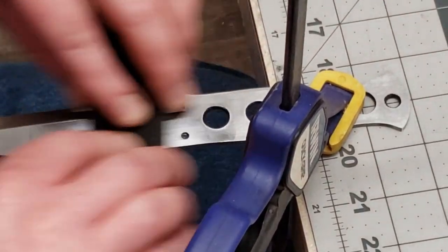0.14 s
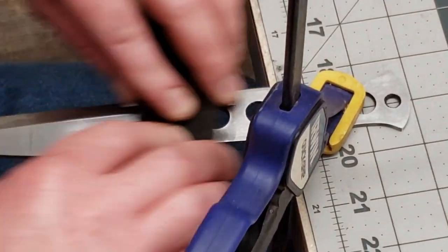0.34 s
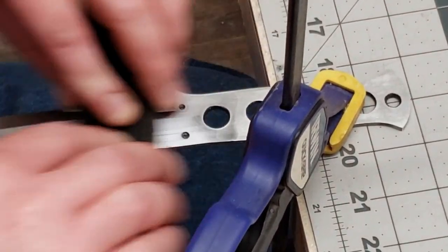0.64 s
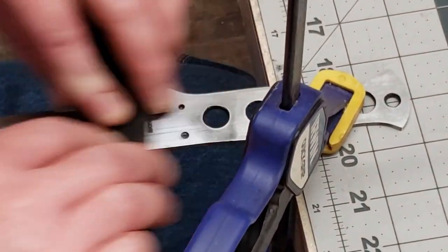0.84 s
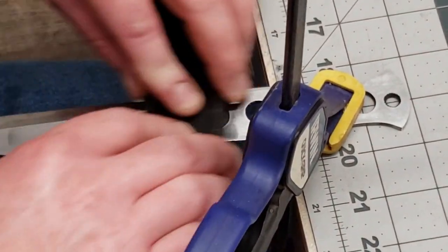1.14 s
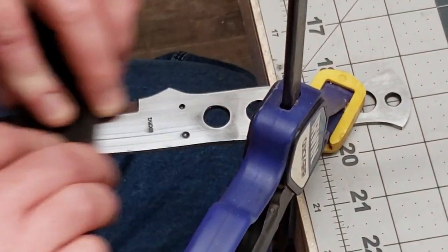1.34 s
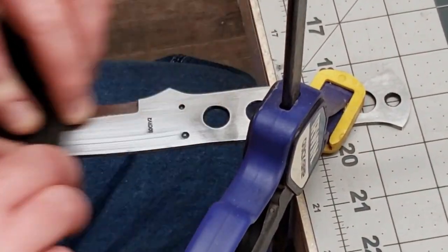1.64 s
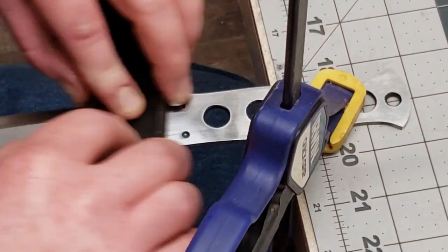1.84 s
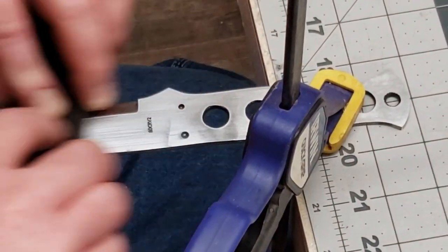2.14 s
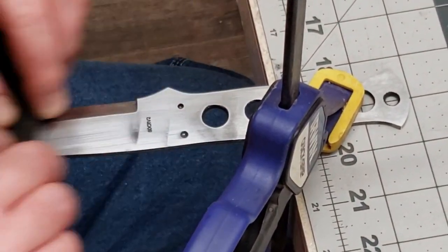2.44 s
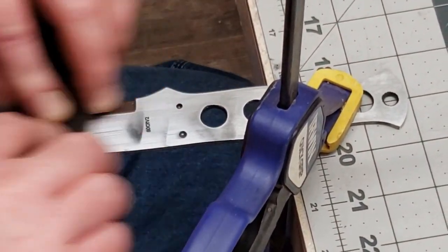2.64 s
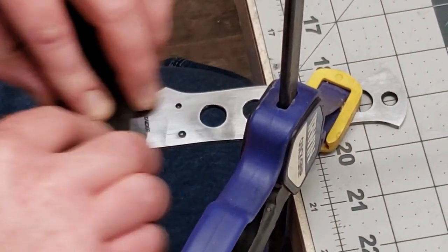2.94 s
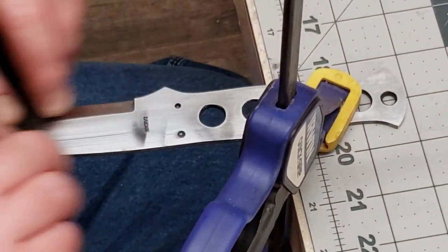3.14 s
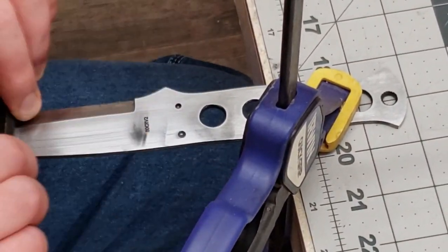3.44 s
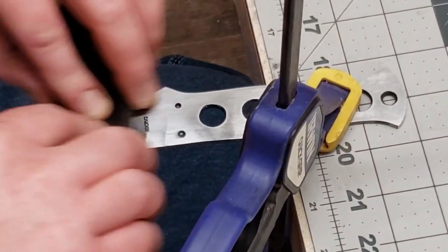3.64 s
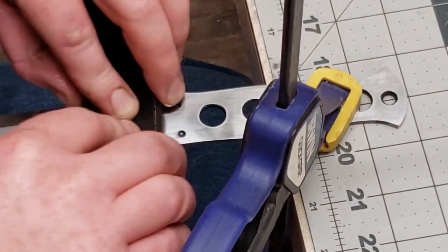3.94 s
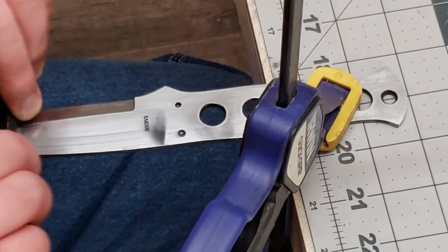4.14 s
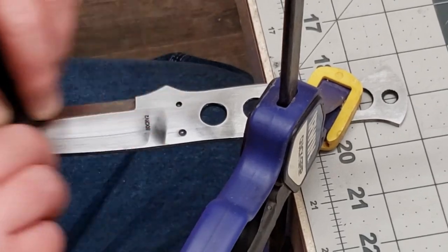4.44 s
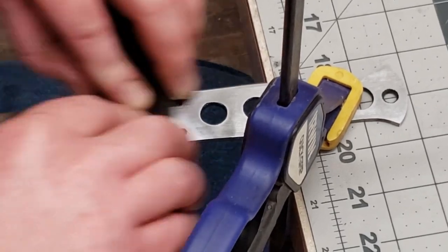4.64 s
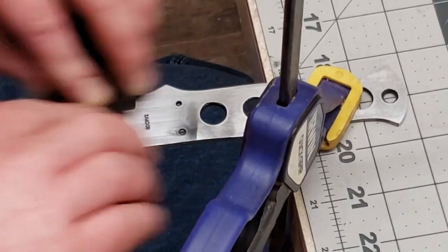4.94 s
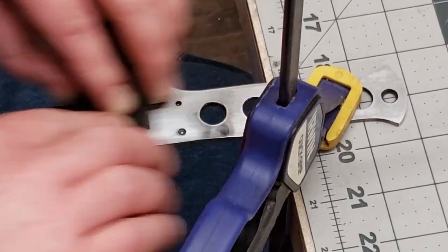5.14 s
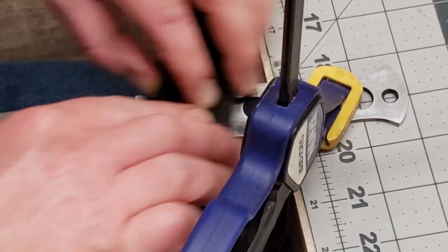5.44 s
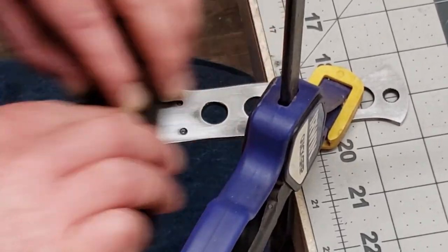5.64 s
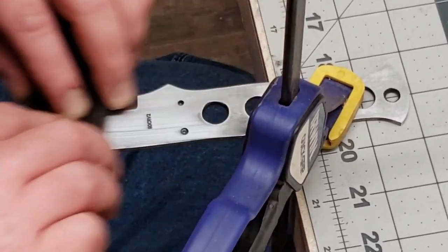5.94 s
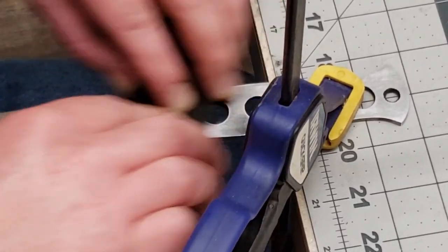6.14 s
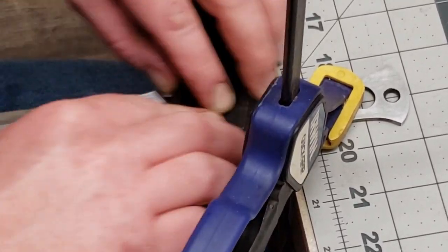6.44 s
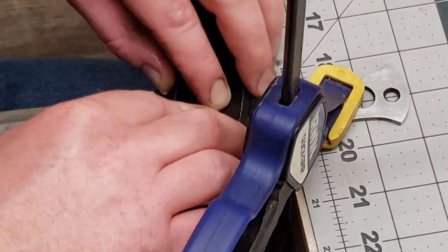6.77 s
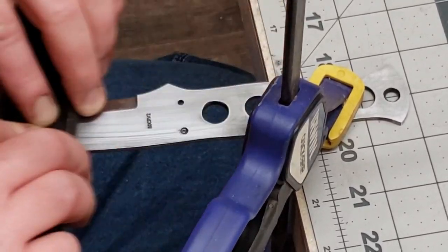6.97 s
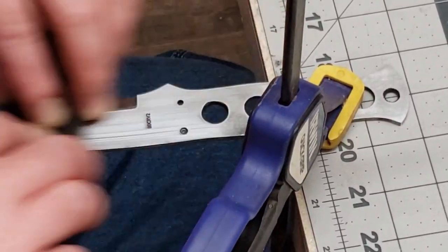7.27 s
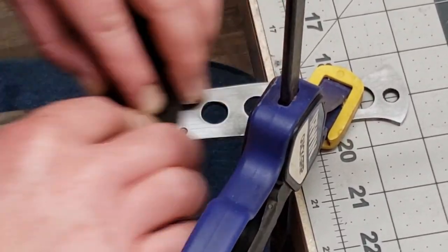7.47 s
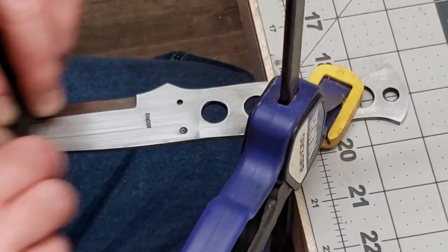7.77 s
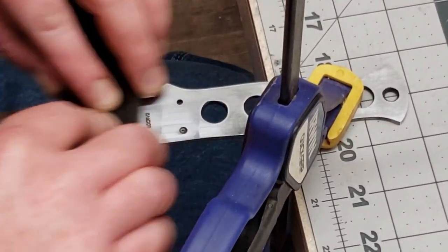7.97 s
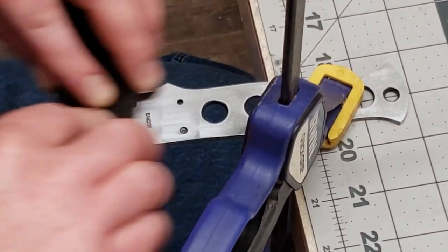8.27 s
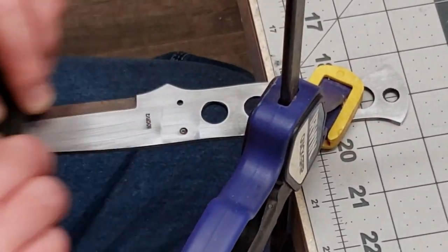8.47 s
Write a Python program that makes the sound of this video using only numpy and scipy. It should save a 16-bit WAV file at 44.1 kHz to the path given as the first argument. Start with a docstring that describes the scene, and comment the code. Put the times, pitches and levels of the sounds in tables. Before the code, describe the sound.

A block wrapped in sandpaper scrubs steadily to and fro over steel. Each stroke is a short, crisp hiss with an abrupt dip as the direction reverses. Beneath it a faint, lumpy low bench rumble swells with the strokes. Irregular soft thumps and clamp rattles, brief squeaky rubs, and small grain clicks interrupt the rhythm. It is recorded very near in a quiet, dry room, and continues to the end without a pause.

```python
"""Close up, grit hisses from the first moment, stroke after stroke, and drops away at each turn.
Sandpaper on a block is rubbed over a steel blade clamped to the edge of a workbench.
Loose grains tick, the paper bites at the step in the blade, and block on blade rubs and squeaks: all shaped noise.
The block knocks blade and bench: dull thumps of decaying sines, over a lumpy rumble of noise in bench modes.
Behind it lie a faint, short room tail and quiet air; the microphone drops the deepest bass."""
import sys
import numpy as np
from scipy import signal
from scipy.io import wavfile
from scipy.ndimage import uniform_filter1d

SR = 44100
rng = np.random.default_rng(int(sys.argv[2]) if len(sys.argv) > 2 else 0)


def wrap_up_sound(samples):
    """Save the sound to the file named by the first command line argument, as 16-bit audio."""
    columns = np.atleast_2d(samples).T
    # keep every value between -1 and 1, then stretch to whole-number steps
    tamed = np.clip(columns, -1, 1)
    steps = np.round(tamed * 32767).astype(np.int16)
    wavfile.write(sys.argv[1], SR, steps)


N = 379701

# Place: level of the air; tail of the room, its level relative to the near sounds
AIR_DB, ROOM_T60_S, ROOM_DB = -73.5, 0.2, -35.5

# Bench shaken by the hands, before the swell within each stroke: start_s, rumble_db, rattle_db
BENCH_SHAKING = [(0.0, -55.5, -62), (0.43, -57, -68.5), (0.81, -52, -54.5), (1.22, -51.5, -58.5),
                 (1.56, -45.5, -58.5), (2.04, -54, -69), (2.47, -49.5, -55), (2.61, -60.5, -65),
                 (3.12, -47.5, -61.5), (3.45, -54.5, -62), (3.64, -51, -64.5), (4.77, -59, -64.5),
                 (5.32, -59, -66.5), (5.83, -46.5, -54), (6.16, -52, -65), (6.62, -45, -59),
                 (7.12, -56.5, -64), (8.61, -58.5, -63)]
# Low bench modes: pitch_hz, width_hz (of each of two passes), relative_level_db
SHAKE_MODES = [(61.4, 87, 1.5), (110.5, 110, -5.5)]
# Higher, rattling bench modes: pitch_hz, width_hz (of each of two passes), relative_level_db
RATTLE_MODES = [(252.7, 210, 2.5), (416.7, 96, 8), (602, 260, 2.5)]
BUILD_UP_DB = 8.5   # the shaking grows over each stroke

# Brief rubs and squeaks of block on blade:
# centre_s, length_s (four standard deviations), pitch_hz, width_hz (of each of two passes), level_db
RUBS = [(0.558, 0.081, 1330, 46.3, -49), (0.595, .07, 1374, 45, -56), (0.755, 0.23, 1320, 70, -56),
        (.93, 0.14, 1380, 70, -57), (4.548, 0.084, 2920, 972, -50), (5.204, 0.049, 423, 247, -43),
        (5.211, 0.049, 1110, 500, -52), (6.589, .03, 725, 231, -50), (2.379, 0.039, 384, 111.1, -43),
        (5.11, 0.076, 510, 200, -53.5), (2.487, 0.019, 1330, 200, -49), (6.802, .01, 1300, 300, -50)]

# Knocks, relative levels: start_s, bench_top_db, bench_swing_db, clamp_db, blade_db
KNOCKS = [(0.204, -34.5, -51, -40.5, -46.5), (0.683, -37.5, -49, -60, -63),
          (0.73, -33.5, -47.5, -38.5, -40), (0.804, -41, -48, -44, -44), (0.92, -27.5, -43.5, -42, -49),
          (0.989, -49, -51, -58, -54), (1.543, -23.5, -37, -20, -30), (1.597, -19, -30, -37, -36),
          (1.718, -38.5, -47, -56, -59), (1.932, -26.5, -37, -29, -32.5), (2.304, -25, -42, -27, -28.5),
          (2.391, -22, -39.5, -42, -39.5), (2.464, -47, -53, -55, -45), (2.501, -50, -45.5, -65, -56),
          (2.609, -25, -40.5, -25, -30), (2.802, -39, -47, -51, -54), (3.117, -42.5, -50.5, -61, -49),
          (3.376, -3.5, -30.5, -21.5, -23), (3.476, -40, -45.5, -50, -45.5),
          (3.878, -21, -42.5, -35.5, -36), (4.317, -28.5, -38.5, -32, -33), (4.596, -38, -45.5, -59, -48),
          (4.673, -36.5, -45.5, -50, -50.5), (5.602, -32, -49, -42, -37.5), (5.78, -29.5, -38, -30, -24),
          (4.48, -39, -55.5, -59, -58), (5.951, -36.5, -51.5, -56, -50), (6.135, -27, -36, -30.5, -25),
          (6.31, -43, -39.5, -50, -61), (6.458, -21, -30.5, -22, -19), (6.496, -31.5, -46, -43, -51),
          (6.561, -35.5, -46, -44, -44), (6.655, -33.5, -37.5, -41, -33.5), (6.767, -32, -39, -36, -27.5),
          (6.812, -23, -28, -30.5, -29.5), (6.925, -37, -45, -58.5, -60.5), (7.779, -34.5, -44, -63, -47),
          (7.898, -32.5, -49, -32.5, -35), (8.347, -35.5, -55, -36, -37)]
# What rings after a knock, one group each for bench top, bench swing, clamp and blade:
# pitch_hz, relative_level_db, ring_s (sets both the swell and the decay)
KNOCKED_PARTS = [
    [(218, -6, 0.04), (344, -9, 0.051), (408, -10, 0.035)],
    [(75.6, 1, 0.12), (120.5, 6.5, 0.082)],
    [(642, -1.5, 0.027), (820, -10.5, 0.037)],
    [(1034, 0, 0.01), (1274, -4, 0.029), (2063, -23.5, 0.045), (2600, -35, 0.014)],
]
# Sharp blows favour the upper modes of the bench top:
# dB per octave, for each dB that the top rings above the swing
SHARPNESS = 0.52

# Loose grains crushed under the paper, relative levels: start_s, low_tick_db, bright_tick_db
TICKS = [(0.0453, -21, -35), (0.3718, -27, -38), (0.4467, -25, -42), (0.7238, -27, -43), (0.9523, -27, -41),
         (1.0972, -23.5, -46), (1.4062, -33, -40), (1.4766, -18, -35), (1.933, -24, -52),
         (2.5127, -32, -36), (2.6357, -29, -40), (3.2042, -36, -38), (5.0425, -18, -47),
         (5.2527, -30, -51.5), (5.3705, -26, -42), (5.7126, -27.5, -48), (6.0657, -22, -30),
         (6.401, -32, -33), (6.627, -24, -33), (7.1287, -31, -38), (7.3387, -24.5, -40), (7.529, -27, -40),
         (7.6942, -28.5, -49), (8.179, -32.5, -39)]

# Strokes from turn to turn: start_s, turn_s (length of the turn before it), hiss_level_db,
# lean_db (late minus early), scrape_db (extra in the lower and middle bands)
STROKES = [(0.0, 0.042, -42.0, 3.5, 1.9), (0.166, 0.062, -46.5, -1.3, 3.5),
           (0.327, 0.045, -40.5, 6.5, -0.9), (0.488, 0.055, -43, 0.1, 1.5), (0.663, 0.039, -42, -0.5, 0.6),
           (0.843, 0.057, -43.5, 8, 2), (1.03, 0.04, -42, 0.9, 2.3), (1.209, 0.049, -44, 8, -1.5),
           (1.398, 0.039, -43, 1, 2), (1.585, 0.041, -43.5, 0, 2.2), (1.798, 0.043, -44.5, -3.5, 0.6),
           (1.971, 0.042, -49, 15, -0.2), (2.152, 0.037, -46, -6.5, 0.6), (2.328, 0.037, -44.5, 0.5, 1.6),
           (2.494, 0.04, -44.5, -6.5, -1), (2.672, 0.048, -45.6, 5, 0), (2.839, 0.038, -44, -8.5, 0.2),
           (3.01, 0.04, -46.5, 10.5, 1), (3.184, 0.046, -47, -4, -0.0), (3.356, 0.047, -47.5, -1, -0.2),
           (3.528, 0.037, -47.5, -6.5, 0.8), (3.712, 0.043, -48, 7.5, -3.5),
           (3.869, 0.04, -47.5, -5.5, 1.5), (4.053, 0.038, -48, 3.5, -1.3), (4.233, 0.05, -46, -6.5, 1.2),
           (4.409, 0.055, -47, 4.5, -1), (4.586, 0.034, -51, 3.5, -0.3), (4.791, 0.038, -49.5, -1.7, -2),
           (4.957, 0.02, -47.5, 1.5, -4.1), (5.149, 0.042, -47.5, -5.5, 0.7),
           (5.316, 0.037, -47.5, 9, -2.5), (5.49, 0.045, -47, 3.5, 0.5), (5.673, 0.059, -41.5, 7, -0.7),
           (5.839, 0.061, -43.5, -1, -1.8), (6.01, 0.052, -46, 4, 1.2), (6.187, 0.052, -44.5, 2.8, -1.2),
           (6.351, 0.046, -42.5, 10, 0.5), (6.519, 0.055, -42, -1, 2.7), (6.689, 0.017, -44, 10.5, 1),
           (6.883, 0.045, -43, -4.0, 0.9), (7.057, 0.028, -44.5, 8.5, -1.2), (7.243, 0.053, -43.5, 2, -2),
           (7.431, 0.039, -46.5, 0.7, -1), (7.617, 0.041, -48.5, 6, -1.7), (7.811, 0.028, -49.5, -8, 1.5),
           (8.021, 0.046, -50.5, 7, -3.5), (8.229, 0.048, -49.7, -1.5, -0.2),
           (8.423, 0.048, -49, 4.5, -2.3)]
# The paper bites harder for a moment: centre_s, extra_db, length_s (two standard deviations)
BITES = [(0.432, 0, 0.015), (0.99, 2.5, 0.013), (1.435, 3, .02), (1.534, 5, .02), (1.74, 5.5, 0.02),
         (2.097, 4.5, .01), (3.227, 8, 0.024), (3.383, 13, .015), (3.91, 2, .02), (4.619, 13.5, 0.035),
         (4.733, 8, 0.011), (5.1, 16, .014), (5.422, 11.5, 0.015), (5.772, 6, 0.012), (6.112, 12, .025),
         (6.443, 7.5, 0.038), (6.615, 3.5, .015), (6.811, 8.5, 0.025), (7.309, 5.5, .015),
         (7.757, 8, 0.018), (8.312, 4, .015)]
REST_DB, DROP_DB_PER_S = -72.5, 906   # hiss with the block at rest; a quick turn does not fall that far
SLOW_DOWN_SHARE, SPEED_UP_SHARE = 0.73, 0.72   # slopes as shares of the turn
ARCH_DB = 1.5   # extra hiss midway along the stroke

# Colour of the grit hiss: pitch_hz, relative_level_db (per Hz), follow (dB of change per dB of stroke level)
GRIT_COLOUR = [(304, -5, 1), (724, -11, 0.78), (1380, -9, 0.63), (2560, -8, 0.54), (3300, -8.5, 0.67),
               (4740, -10, 0.7), (5680, -5.5, 1.0), (8110, 1, 1.13), (10580, -7.5, 1.47),
               (12100, -17.5, 0.7), (15620, -23.5, 2)]
# Faint rings of the blade: pitch_hz, width_hz (of each of two passes), level_db (relative to the hiss)
BLADE_RINGS = [(1354, 49, -33.5), (3588, 270, -20), (6020, 390, -17)]
# Slow course of the top of the hiss: time_s, level_db
SHEEN = [(0, -0.5), (1.2, 0.5), (2.4, 1), (3.6, -1), (4.8, -2.5), (6, -3), (7.2, 1.5), (8.61, -4)]
# Scrape acts below SCRAPE_HZ; sheen sets in at SHEEN_HZ and is full an octave higher
USUAL_STROKE_DB, SCRAPE_HZ, SHEEN_HZ = -44, 4600, 8500


def from_db(db):
    """Decibels to gain."""
    return 10 ** (np.asarray(db) / 20)


def rms_one(x):
    """Scaled to rms 1."""
    return x / np.sqrt(np.mean(x ** 2) + 1e-20)


def drift(rate_hz):
    """Slow random wander of rms 1: noise smoothed at every 20th sample, then joined by lines."""
    pole = np.exp(-2 * np.pi * rate_hz * 20 / SR)
    noise = rng.standard_normal(N // 20 + 2002)
    slow = signal.lfilter([1], [1, -2 * pole, pole * pole], noise)[2000:]   # settled part only
    return np.interp(np.arange(N) / 20, np.arange(len(slow)), rms_one(slow))


def resonate(x, hz, width_hz):
    """One resonance, gain about 1 on top."""
    r = np.exp(-np.pi * width_hz / SR)
    feedback = [1, -2 * r * np.cos(2 * np.pi * hz / SR), r * r]
    return signal.lfilter(np.array([1, 0, -1]) * (1 - r * r) / 2, feedback, x)


def resonate_twice(x, hz, width_hz):
    """The same resonance passed twice, for steeper skirts."""
    return resonate(resonate(x, hz, width_hz), hz, width_hz)


def add(out, start_s, sound):
    """Lays a sound into out at start_s."""
    i = round(start_s * SR)
    out[i:i + len(sound)] += sound[:N - i]


def stroke_phase():
    """Strokes done so far, counting smoothly."""
    turns_s = [row[0] for row in STROKES] + [N / SR]
    return np.interp(np.arange(N) / SR, turns_s, np.arange(len(STROKES) + 1))


def stroke_db(bend=0.225):
    """Hiss level in time: up from the turn, leaning across the blade, down to the next turn, plus the bites."""
    start, turn_s, level, lean, _ = np.transpose(STROKES)
    end = np.append(start[1:], N / SR)
    turn_db = (level + np.roll(level, 1)) / 2 - DROP_DB_PER_S * turn_s
    turn_db = np.maximum(turn_db, REST_DB)
    early = start + SPEED_UP_SHARE * turn_s
    late = end - SLOW_DOWN_SHARE * np.roll(turn_s, -1)
    points_s = np.transpose([start, early, (early + late) / 2, late]).ravel()
    points_db = np.transpose([turn_db, level - lean / 2, level + ARCH_DB, level + lean / 2]).ravel()
    t = np.arange(N) / SR
    # lines drawn in bent gain: the block leaves and reaches rest abruptly
    eased = from_db(bend * np.append(points_db, REST_DB))
    level_db = 20 * np.log10(np.interp(t, np.append(points_s, N / SR), eased)) / bend
    for centre_s, extra_db, length_s in BITES:
        level_db += extra_db * np.exp(-2 * ((t - centre_s) / length_s) ** 2)
    return level_db


def air():
    """Quiet air: steady noise through two broad resonances."""
    noise = rng.standard_normal(N)
    return from_db(AIR_DB) * rms_one(resonate(resonate(noise, 900, 4900), 2000, 20000))


def room(near):
    """Reflections as a decaying, dull noise tail, starting 4 ms after the direct sound."""
    t = np.arange(SR // 3) / SR
    dull = signal.lfilter([.4], [1, -.6], rng.standard_normal(len(t)))
    tail = dull * from_db(-60 * t / ROOM_T60_S) * (t > .004)
    return signal.fftconvolve(near, tail / np.sqrt(np.sum(tail ** 2)))[:N]


def bench(level_db, follows=0.22):
    """Lumpy noise shakes the bench modes; it grows over each stroke and eases a little at each turn."""
    start_s, shake_db, rattle_db = np.transpose(BENCH_SHAKING)
    t, out = np.arange(N) / SR, 0
    for modes, course_db in (SHAKE_MODES, shake_db), (RATTLE_MODES, rattle_db):
        push = rng.standard_normal(N) * from_db(4.0 * drift(14.0))
        body = sum(from_db(db) * resonate_twice(push, hz, width_hz) for hz, width_hz, db in modes)
        out = out + from_db(np.interp(t, start_s, course_db)) * rms_one(body)
    growth_db = uniform_filter1d(BUILD_UP_DB * (stroke_phase() % 1 - .5), size=600)
    easing_db = follows * np.minimum(level_db - USUAL_STROKE_DB, 0)
    return out * from_db(growth_db + easing_db)


def rubs():
    """Block rubbing on blade: each rub is noise in one resonance, swelling and fading."""
    out, t = np.zeros(N), np.arange(SR // 4) / SR
    pushes = rng.standard_normal((len(RUBS), len(t)))
    for (centre_s, length_s, hz, width_hz, db), push in zip(RUBS, pushes):
        tone = rms_one(resonate_twice(push, hz, width_hz))
        swell = np.exp(-8 * ((t - .125) / length_s) ** 2)   # peaks 0.125 s into the snippet
        add(out, centre_s - .125, from_db(db) * tone * swell)
    return out


def knocks(gain_db=2.5, scatter_db=1.04):
    """The blow travels through clamp and bench, so each mode swells before it dies; long rings peak later."""
    out, t = np.zeros(N), np.arange(SR // 8) / SR
    chance = rng.standard_normal((len(KNOCKS), 2, 12))
    for (start_s, *part_levels), (scatter, turn) in zip(KNOCKS, chance):
        top_over_swing_db = part_levels[0] - part_levels[1]
        modes = []
        for part, (group, part_db) in enumerate(zip(KNOCKED_PARTS, part_levels)):
            for hz, mode_db, ring_s in group:
                db = part_db + mode_db
                if part == 0:   # bench top
                    db += SHARPNESS * (top_over_swing_db - 10) * np.log2(hz / 300)
                modes.append((hz, db, ring_s))
        for (hz, db, ring_s), a, b in zip(modes, scatter, turn):
            x = t * 12.12 / ring_s
            swell = x * np.exp(1 - x)   # peaks at 1, about 75 dB down after ring_s
            tone = np.sin(2 * np.pi * hz * t + 3 * b)
            add(out, start_s, from_db(db + gain_db + scatter_db * a) * swell * tone)
    return out


def ticks():
    """A crushed grain: a millisecond or two of noise, low and bright parts."""
    out, t = np.zeros(N), np.arange(256) / SR
    envelope = (1 - np.exp(-t / 0.00037)) * np.exp(-t / 0.0013)
    noise = rng.standard_normal((len(TICKS), 2, 256))
    for (start_s, low_db, bright_db), (a, b) in zip(TICKS, noise):
        low = rms_one(resonate(resonate(a, 1660, 3000), 2000, 3000)) * from_db(low_db - 7.0)
        bright = rms_one(resonate_twice(b, 7800, 3500)) * from_db(bright_db + 4.5)
        add(out, start_s, (low + bright) * envelope)
    return out


def grit(level_db, spread_db=3.0, patchy_db=2.0, shared_db=0.5, dulling=0.077, arch_db=12.5):
    """Every grain scratches a tiny click; faster strokes are brighter; the blade rings faintly along."""
    hz, colour_db, follows = np.transpose(GRIT_COLOUR)
    click_db = spread_db * np.minimum(rng.exponential(1, (2, N)), 5)
    clicks = rng.standard_normal((2, N)) * from_db(click_db)

    swing = np.minimum(level_db - USUAL_STROKE_DB, -4.0)   # brightness grows with speed away from the turns
    pressed = level_db - USUAL_STROKE_DB - swing   # pressing harder feeds the main hiss most
    chatter_db = (shared_db + 0.12 * pressed) * drift(95)   # hard pressure chatters

    phase = stroke_phase()
    sheen_db = np.interp(np.arange(N) / SR, *np.transpose(SHEEN))
    scrape_db = np.interp(phase - .5, np.arange(len(STROKES)), [row[-1] for row in STROKES])
    speed = np.abs(np.sin(np.pi * phase))   # fastest midway along the blade, where the top is brightest
    top_db = sheen_db - dulling * pressed + arch_db * (speed - .7)

    edges, out = np.geomspace(250, 17000, num=30), 0
    for k, (low, high) in enumerate(zip(edges, edges[1:])):
        log_centre = np.log(low * high) / 2
        band_filter = signal.butter(3, [low, high], "band", fs=SR, output="sos")
        band = signal.sosfilt(band_filter, clicks[k % 2])   # neighbouring bands use different clicks
        share = np.interp(log_centre, np.log(hz), follows)
        gain_db = np.interp(log_centre, np.log(hz), colour_db) + share * swing
        gain_db = gain_db - np.clip(1 - share, 0, 1) * pressed
        gain_db = gain_db + scrape_db * (high < SCRAPE_HZ)
        gain_db = gain_db + top_db * np.clip(np.log2(high / SHEEN_HZ), 0, 1)
        # the stroke level itself is applied at the end, so swing is taken out here
        out = out + from_db(gain_db - swing + patchy_db * drift(36)) * band
    out = rms_one(out)

    for ring_hz, width_hz, db in BLADE_RINGS:   # the hand damps the blade unevenly, so the rings come and go
        ring = rms_one(resonate_twice(clicks[0], ring_hz, width_hz))
        out += from_db(db + 1.2 * drift(16)) * ring
    return from_db(level_db + chatter_db) * out


def scene():
    """Grit, ticks, knocks and rubs close by, with their room tail, over the bench rumble and quiet air."""
    level_db = stroke_db()
    near = grit(level_db) + ticks() + knocks() + rubs()
    mix = near + from_db(ROOM_DB) * room(near) + bench(level_db) + air()
    return mix[None]   # one channel


def record(dry):
    """The microphone drops the deepest bass; the top is cut steeply, 70 dB down from 15970 Hz."""
    bass_cut = signal.butter(4, 42, "high", fs=SR, output="sos")
    top_cut = signal.cheby2(16, 70, 15970, fs=SR, output="sos")
    return signal.sosfilt(top_cut, signal.sosfilt(bass_cut, dry))


dry = scene()
out = record(dry)
wrap_up_sound(out)
```